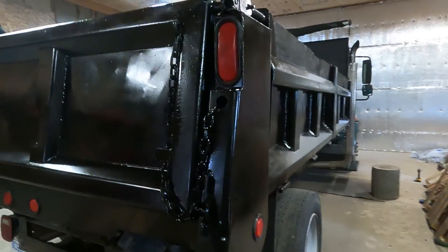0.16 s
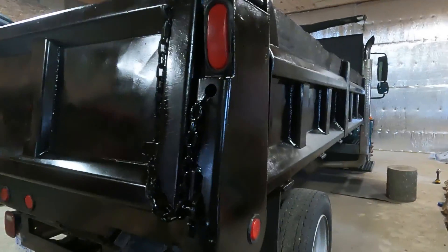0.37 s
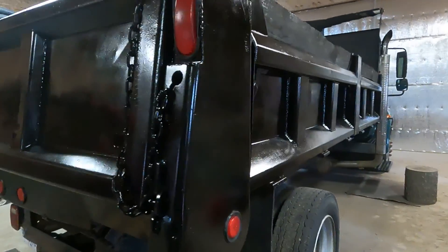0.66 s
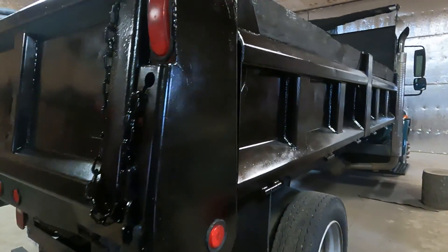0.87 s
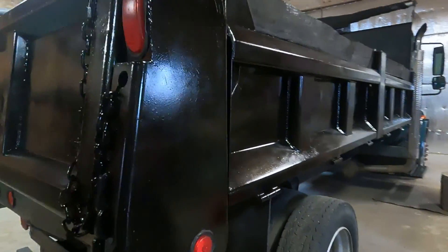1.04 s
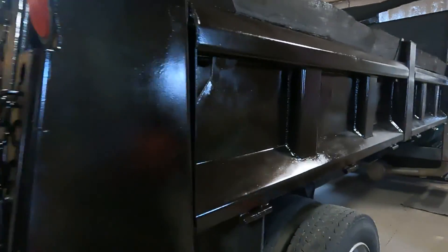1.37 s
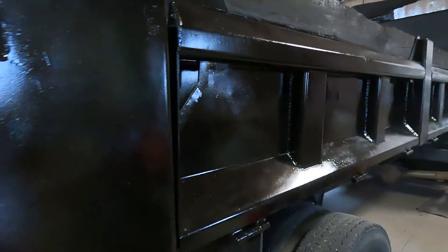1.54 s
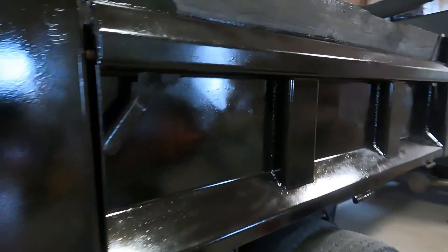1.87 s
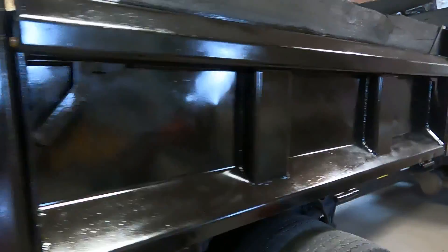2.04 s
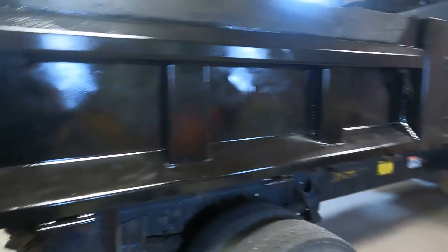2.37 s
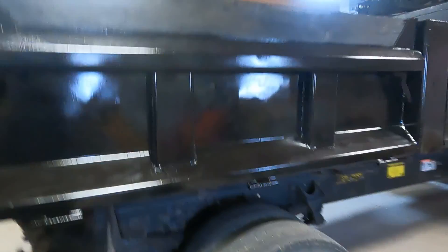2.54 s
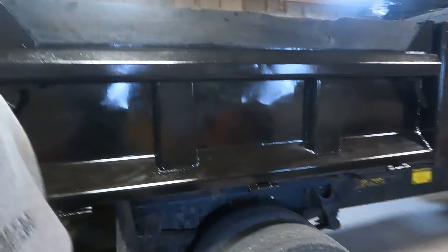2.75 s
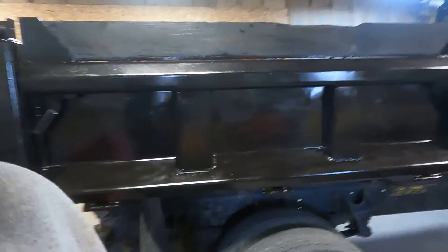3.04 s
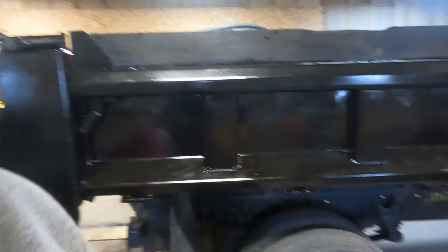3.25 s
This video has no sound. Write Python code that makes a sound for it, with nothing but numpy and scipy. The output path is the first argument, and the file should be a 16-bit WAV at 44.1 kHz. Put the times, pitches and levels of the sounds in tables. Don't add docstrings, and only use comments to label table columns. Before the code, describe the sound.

Shoe scuffs on gritty concrete, close to a dull handheld microphone in a large reverberant workshop. Low hum and faint cloth brushing open; short crunches follow at 0.2, 0.45 and 0.7 seconds, with a sharp stone snap near 0.9. Lighter scrapes come around 1.3 and 1.6-1.9. From 2.1, knocks and heavier crunching, rubber rasps and bright pebble clicks crowd together until about 3.1, then ring away.

```python
import sys
import numpy as np
from scipy import signal
from scipy.fft import rfft, irfft, next_fast_len
from scipy.io import wavfile
from scipy.ndimage import map_coordinates

SR = 44100
rng = np.random.default_rng(int(sys.argv[2]) if len(sys.argv) > 2 else 0)


def pcm_store(signal):
    levels = np.round(np.clip(np.atleast_2d(signal), -1, 1) * 32767)
    wavfile.write(sys.argv[1], SR, levels.astype(np.int16).T)


def convert_level_to_amplitude(level_db):
    exponent = np.asarray(level_db, float) / 20
    return 10 ** exponent


N = 149940


def unit(x):
    return x / np.sqrt(np.mean(x ** 2) + 1e-20)


def along(points, hz):
    f, v = np.transpose(points)
    return np.interp(np.log(hz + 1), np.log(f + 1), v)


def filtered(x, response):
    n = x.shape[-1]
    m = next_fast_len(n + 4096)
    return irfft(rfft(x, m) * response(np.fft.rfftfreq(m, 1 / SR)), m)[..., :n]


def wobble(knots_per_s):
    knots = rng.standard_normal(N // 16)
    return map_coordinates(knots, [np.arange(N) * knots_per_s / SR])


def resonance(hz, q):
    return lambda f: 1j * f * hz / q / (hz * hz - f * f + 1j * f * hz / q)


# f/Hz, density/dB per Hz
AIR = [(15, -58), (25, -8.5), (49, -22), (66, -10), (160, -3.5), (453, -11.5), (716, -13), (3280, -12.5),
       (8000, -32), (10400, -43), (17600, -120)]


def air():
    hiss = unit(filtered(rng.standard_normal(N), lambda f: convert_level_to_amplitude(along(AIR, f) - along(MIC, f))))
    level_db = -42 + 0.34 * wobble(5.93)
    return convert_level_to_amplitude(level_db) * hiss


# f/Hz, t60/s
HALL = [(100, 0.55), (400, 0.67), (1500, 0.73), (4000, 0.63), (8000, 0.64), (13000, 0.4)]
HALL_DELAY_S, STRIDE_S = 0.008, 0.25


def hall(x):
    hop = round(STRIDE_S * SR)
    out = np.zeros(N + 3 * SR)
    padded = np.pad(x, (hop, 2 * hop))
    for i in range(0, N + hop, hop):
        hz, t, z = signal.stft(rng.standard_normal(SR), SR, nperseg=256)
        decay = convert_level_to_amplitude(-60 * t / along(HALL, hz)[:, None])
        tail = signal.istft(z * decay, SR, nperseg=256)[1]
        stride = padded[i:i + 2 * hop] * np.hanning(2 * hop)
        wet = signal.fftconvolve(stride, tail / np.linalg.norm(tail))
        out[i:i + len(wet)] += wet
    return out[hop - round(HALL_DELAY_S * SR):][:N]


BIGGEST_GRAIN = 2.45
FLUTTER_DB, FLUTTER_PER_S = 2, 90
BROAD_HZ, BROAD_Q, BROAD_LOW_HZ = 3500, 0.28, 1170
LOW_CUT = 0.49


def strokes(rows, per_s, spread_db, q, broad_db, q_grows=0, swell=0.27):
    chance = rng.random(N)
    size = np.minimum(rng.exponential(1, N), BIGGEST_GRAIN)
    density = 0.071 + (chance < per_s / SR)
    grains = rng.standard_normal(N) * convert_level_to_amplitude(spread_db * size) * density
    grains = grains * convert_level_to_amplitude(FLUTTER_DB * wobble(FLUTTER_PER_S))
    wide = resonance(BROAD_HZ, BROAD_Q)
    out = np.zeros(N + SR)
    for k, (start_s, rise_s, fall_s, db, hz) in enumerate(rows):
        i = round(start_s * SR)
        t = np.arange(int((rise_s + 2 * fall_s) * SR)) / SR
        growth = np.minimum(t / rise_s, 1) ** swell
        decay = convert_level_to_amplitude(-20 * np.maximum(t - rise_s, 0) / fall_s)
        raw = unit(np.roll(grains, -i - k * 3001)[:len(t)])
        peak = resonance(hz, q * (hz / 700) ** q_grows)

        def response(f):
            body = peak(f) ** 2 * (f / (f - 1j * LOW_CUT * hz)) ** 4
            broad = wide(f) ** 2 * (f / (f - 1j * BROAD_LOW_HZ)) ** 2
            return body + convert_level_to_amplitude(broad_db) * broad

        out[i:i + len(t)] += convert_level_to_amplitude(db) * unit(filtered(raw, response)) * growth * decay
    return out[:N]


def snaps(rows):
    out = np.zeros(N + 2048)
    blow = np.eye(1, 2048)[0]
    for s, peak_db, hz, q in rows:
        click = filtered(blow, lambda f: resonance(hz, q)(f) ** 2)
        out[round(s * SR):][:len(blow)] += convert_level_to_amplitude(peak_db) * click / np.abs(click).max()
    return out[:N]


# start t/s, rise t/s, fall t/s, level/dB, f/Hz
CLOTH = [(.001, 0.0096, 0.99, -43.5, 1970), (.026, 0.0091, 0.023, -38.5, 4600),
         (.116, 0.018, 0.04, -37.5, 4900), (.111, 0.009, 0.027, -41, 251),
         (.2095, 0.038, 0.087, -29.5, 340), (.431, 0.025, 0.046, -24.5, 2270),
         (.7035, 0.018, 0.04, -25.5, 746), (1.2715, 0.013, 0.064, -30, 3400),
         (1.571, 0.019, 0.062, -33, 1020), (1.79, 0.035, 0.25, -29.5, 10300), (1.931, .09, 0.38, -45, 470),
         (2.101, 0.0097, 0.092, -36, 2070), (2.181, 0.061, 0.15, -38, 1730),
         (2.206, 0.019, 0.06, -33, 3480), (2.37, 0.022, 0.12, -27.5, 650), (2.521, 0.11, 0.047, -27, 362),
         (2.571, 0.024, 0.06, -18, 3800), (2.8695, 0.0037, 0.014, -30, 3500),
         (2.922, 0.021, 0.028, -27.5, 950), (3.021, 0.057, 0.042, -30, 325),
         (3.036, 0.032, 0.015, -26, 2290)]


def cloth():
    return strokes(CLOTH, per_s=5400, spread_db=4.5, q=1.34, broad_db=-8, q_grows=0.15)


# t/s, peak level/dB, f/Hz, q
KNOCKS = [(.2115, -32, 473, 3), (.2495, -30.5, 355, 1.7), (.5055, -28, 791, 2.6), (.7075, -25.5, 605, 1.8),
          (.7225, -24, 297, 1.04), (.7255, -20.5, 780, 4.3), (.7365, -19, 770, 3),
          (2.1535, -27.5, 460, 2.8), (2.275, -34.5, 182, 2), (1.579, -37, 404, 1.9),
          (1.6075, -35, 431, 2.1), (2.4375, -29, 334, 2.7), (2.3055, -25, 350, 2), (2.3186, -18, 425, 1.8),
          (2.3195, -25.5, 223, 1.45), (2.3255, -23, 423, 3.4), (2.332, -26.5, 390, 2),
          (2.3361, -28.5, 400, 2.2), (2.7178, -13, 3600, 1), (1.6146, -17, 3700, 4), (1.7397, -18, 3500, 4),
          (1.8124, -16.5, 3790, 5.2), (2.9485, -24.5, 515, 2.7), (2.956, -26, 550, 2),
          (3.06, -30, 500, 1.4)]


def knocks():
    return snaps(KNOCKS)


# start t/s, rise t/s, fall t/s, level/dB, f/Hz
SOLE = [(.02, 0.052, 0.019, -45.5, 312), (.208, 0.034, 0.086, -29.5, 655), (.421, 0.0077, 0.1, -31, 1500),
        (.48, 0.041, 0.014, -39, 624), (.702, 0.03, 0.0072, -22, 1320), (.705, 0.012, 0.081, -30, 327),
        (1.268, 0.0056, 0.21, -41.5, 228), (1.56, 0.05, 0.072, -35.5, 440), (1.87, 0.055, .04, -45, 220),
        (2.097, 0.0013, 0.01, -32.5, 664), (2.145, 0.019, 0.023, -40.5, 437),
        (2.146, 0.0087, 0.028, -31.5, 1230), (2.268, 0.016, 0.027, -38, 200),
        (2.302, 0.01, 0.04, -28.5, 420), (2.316, 0.0044, 0.04, -26, 251), (2.35, 0.081, 0.081, -35, 320),
        (2.39, 0.047, 0.08, -32, 1930), (2.508, .012, 0.05, -20.5, 1480), (2.55, 0.06, 0.0089, -27, 1910),
        (2.62, 0.0091, 0.032, -23, 1750), (2.65, 0.25, 0.2, -37.5, 349), (2.775, 0.017, 0.039, -26.5, 1270),
        (2.925, 0.022, 0.022, -30.5, 633), (3.035, 0.015, 0.021, -28, 1230)]


def soles():
    return strokes(SOLE, per_s=2300, spread_db=3.5, q=1.16, broad_db=-16.5, q_grows=0.15)


# start t/s, rise t/s, fall t/s, level/dB, f/Hz
RASP = [
    (2.36, 0.071, 0.041, -30, 1580),
    (2.508, 0.016, 0.053, -22, 1168),
    (2.555, 0.048, 0.017, -24.5, 1188),
    (2.775, 0.023, 0.058, -24.5, 1410),
    (2.43, 0.018, .06, -31.5, 1650),
    (2.64, 0.016, 0.16, -32, 1760),
    (2.82, .02, .06, -31.5, 1610),
]


def rasps():
    return strokes(RASP, per_s=900, spread_db=3.5, q=6.8, broad_db=-18.5)


# start t/s, rise t/s, fall t/s, level/dB, f/Hz
SCUFF = [(1.345, 0.044, .09, -30, 2220), (.716, 0.011, 0.032, -21.5, 1450), (.738, .006, 0.036, -17, 2120),
         (1.272, 0.021, 0.052, -24.5, 3270), (1.595, 0.047, .03, -34, 3300),
         (1.685, 0.0081, 0.12, -33, 2800), (1.811, .004, 0.037, -31, 3400),
         (1.835, 0.022, .035, -29.5, 3200), (2.8688, 0.0026, 0.019, -14, 3550),
         (3.02, 0.031, .025, -21, 2450), (1.275, 0.023, .04, -31.5, 2100), (.722, 0.01, 0.037, -26.5, 804),
         (0.424, 0.022, .04, -28.5, 4100), (1.84, 0.016, .03, -29.5, 2640),
         (1.625, 0.023, .03, -32.5, 2860), (0.4945, .015, .025, -29, 1730)]


def scuffs():
    return strokes(SCUFF, per_s=4000, spread_db=3.5, q=2.5, broad_db=-18, swell=0.84)


# t/s, peak level/dB, f/Hz
SNAPS = [(0.4228, -13.5, 1490), (0.4838, -7, 3780), (0.878, -3.5, 3400), (1.2756, -17, 3520),
         (1.3713, -11, 4060), (1.6873, -20, 3800), (1.4043, -19, 2570), (2.0973, -33, 1150),
         (1.8549, -14, 3630), (2.2657, -19, 3820), (2.471, -2.5, 3320), (2.494, -17, 1810),
         (2.5108, -9.5, 1340), (2.5737, -9.5, 1240), (2.6094, -14, 1240), (2.6282, -6, 1720),
         (2.7178, -12.5, 1850), (2.7996, -11, 1500), (2.8691, -1, 3670), (2.903, -8, 3670),
         (2.949, -14, 1110), (3.0552, -9, 3070), (3.116, -21, 3750)]


def stones():
    return convert_level_to_amplitude(-2.5) * snaps([(*row, 1.88) for row in SNAPS])


# start t/s, rise t/s, fall t/s, level/dB, f/Hz
GRIT = [(.205, 0.048, 0.044, -25, 3500), (.285, 0.0048, 0.08, -26.5, 2090),
        (.419, 0.015, 0.031, -20.5, 3100), (.47, 0.035, 0.037, -26.5, 2830), (.55, 0.082, 0.034, -38, 2480),
        (.6995, 0.05, 0.02, -17.5, 2130), (.855, 0.03, 0.0093, -21.5, 3560),
        (1.27, 0.037, 0.11, -28.5, 3380), (1.33, 0.073, 0.23, -31, 2280), (1.58, 0.076, .03, -30, 3500),
        (1.684, 0.0044, 0.23, -30, 2700), (1.81, 0.0042, 0.02, -30, 3630), (1.83, 0.028, 0.03, -24, 3500),
        (2.143, 0.024, 0.034, -28, 4160), (2.268, 0.018, 0.1, -19.5, 3580), (2.3, 0.064, 0.063, -19, 2620),
        (2.39, 0.018, 0.042, -39, 3500), (2.47, 0.0064, 0.15, -24.5, 3500), (2.54, 0.07, 0.068, -17, 3830),
        (2.77, 0.034, 0.14, -22, 3500), (2.868, 0.0034, 0.085, -21.5, 3570), (2.9, 0.053, 0.095, -21, 4200),
        (3.02, 0.038, 0.032, -20, 2840), (3.085, 0.015, 0.036, -25.5, 3500), (.398, 0.018, .02, -28, 3500),
        (2.25, 0.017, .02, -31, 3500)]


def grit():
    return strokes(GRIT, per_s=9000, spread_db=0, q=1, broad_db=13)


def scene():
    crunch = grit() + scuffs()
    rubber = soles() + rasps()
    rustle, clicks, thuds = cloth(), stones(), knocks()
    wet = hall(crunch + rustle + convert_level_to_amplitude(1.5) * rubber + clicks + convert_level_to_amplitude(-2) * thuds)
    mix = crunch + rubber + rustle + clicks + thuds + convert_level_to_amplitude(-3.5) * wet + air()
    return np.array([mix, mix])


def band_limit(x):
    return signal.sosfilt(signal.butter(12, 14580, fs=SR, output="sos"), x)


# f/Hz, gain/dB
MIC = [(60, 10), (150, 11.5), (1000, 3), (4500, -3), (6500, -10), (8200, -19), (10300, -20), (12200, -20.5),
       (14000, -43)]
# f/Hz, side over mid level/dB
PORTS = [(30, -24), (200, -41), (2000, -39), (6000, -30), (9000, -13.5), (11000, -16), (12200, 0.5),
         (14000, -10)]
# f/Hz, level/dB
HISS = [(7000, -30), (10000, -3), (12000, 6), (13000, -10), (14000, -35)]
HISS_DB = -73.5
NOTCH_HZ, NOTCH_WIDTH_HZ, TOP_HZ = 9000, 1540, 13650


def record(dry):
    notch = resonance(NOTCH_HZ, NOTCH_HZ / NOTCH_WIDTH_HZ)
    mid = filtered(dry[0], lambda f: convert_level_to_amplitude(along(MIC, f)))
    hz, _, z = signal.stft(mid, SR, nperseg=256)
    random_phase = np.exp(2j * np.pi * rng.random(z.shape))
    turned = z * random_phase * convert_level_to_amplitude(along(PORTS, hz))[:, None]
    side = signal.istft(turned, SR, nperseg=256)[1][:N]
    hiss = convert_level_to_amplitude(HISS_DB) * unit(filtered(rng.standard_normal((2, N)), lambda f: convert_level_to_amplitude(along(HISS, f))))
    ports = np.array([mid + side, mid - side]) + hiss
    ports = filtered(ports, lambda f: (1 - notch(f)) / (1 + (f / TOP_HZ) ** 50))
    return band_limit(ports)


dry = scene()
out = record(dry)
pcm_store(out)
```